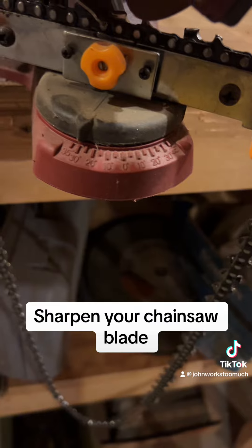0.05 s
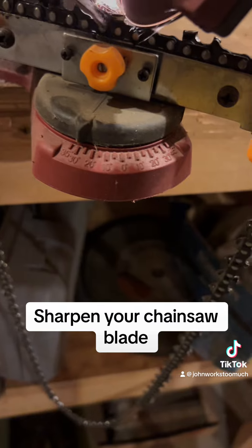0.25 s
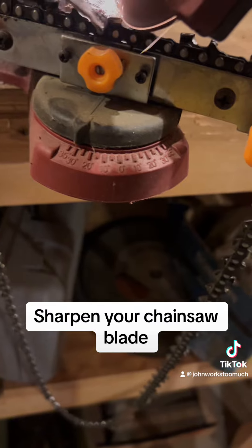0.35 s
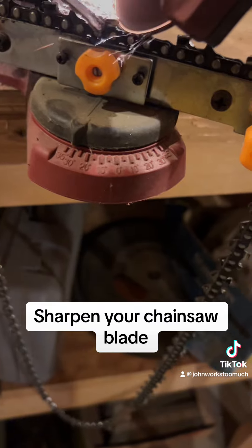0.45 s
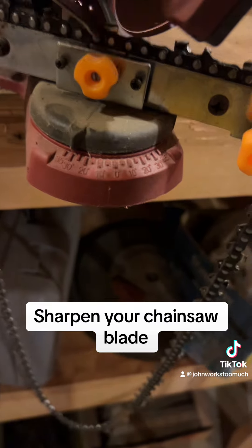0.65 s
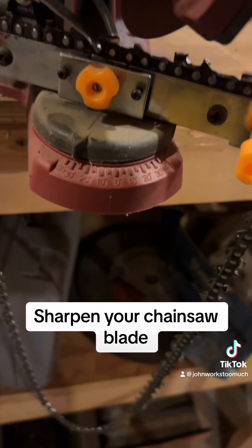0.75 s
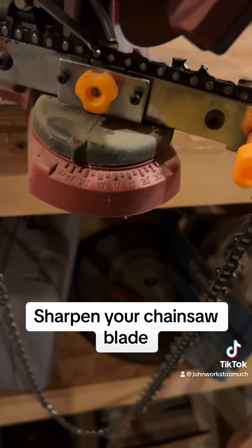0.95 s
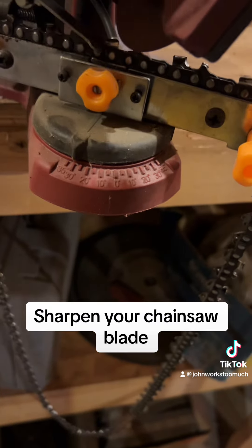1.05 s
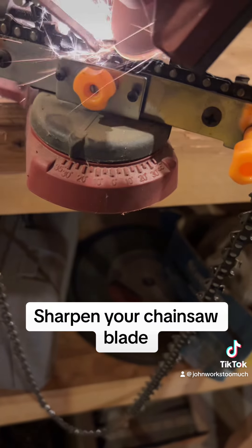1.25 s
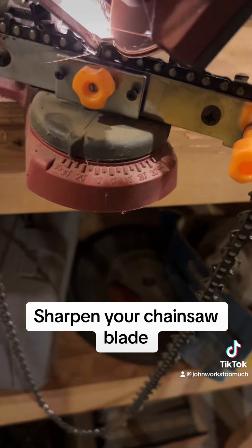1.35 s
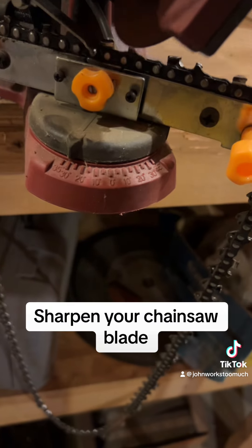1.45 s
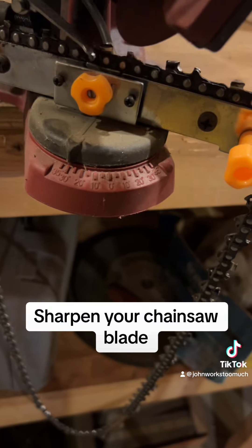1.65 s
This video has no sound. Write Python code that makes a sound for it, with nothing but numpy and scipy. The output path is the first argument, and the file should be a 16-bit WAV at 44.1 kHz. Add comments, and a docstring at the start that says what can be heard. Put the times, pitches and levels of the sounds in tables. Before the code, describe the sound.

Close to the microphone in a workshop, a chain sharpener's wheel bites a metal tooth twice with a high, gritty scrape. Underneath, the motor hums and whines, sagging in pitch with each grind, then recovering.

```python
"""At a workbench, a phone's two microphones stand close to a small chain sharpener that is running.
Its brushed motor whines over mains hum and the rush of brushes and fan. Twice the wheel is lowered
onto a chain tooth: the grit rings tooth, chain and vise, hardest once a turn. The load slows the
motor, whose whine climbs back after each pass. The phone's gain control ducks the loud passes."""
import sys
import numpy as np
from scipy import signal
from scipy.fft import rfft, irfft
from scipy.io import wavfile
from scipy.ndimage import uniform_filter1d

SR = 44100
rng = np.random.default_rng(int(sys.argv[2]) if len(sys.argv) > 2 else 0)


def generate_wav(sig):
    """Save sig (samples, or channels by samples) to the path in sys.argv[1] as 16-bit PCM at SR."""
    pcm = np.round(np.clip(np.atleast_2d(sig).T, -1, 1) * 32767).astype(np.int16)
    wavfile.write(sys.argv[1], SR, pcm)


N = 74970

# Mains hum. Each row: frequency in Hz, level in dB.
MAINS_HUM = [(120, -59.5), (240, -57.5), (480, -59), (600, -60.5), (720, -57)]
# Spectrum of brushes and fan. Each row: frequency in Hz, relative level in dB.
RUSH_SPECTRUM = [(18, -49), (30, -13.5), (63, 6), (237, -13), (409, -20), (802, -7), (1110, -16),
                 (1690, -17.5), (1920, -16.5), (3310, -20.5), (4930, -18.5), (5730, -16.5), (8120, -17.5),
                 (9900, -20), (11500, -35), (15000, -82), (22000, -120)]
# The shaft, sagging twice under load. Each row: time in seconds, speed in Hz.
SHAFT_SPEED = [(0, 75.78), (.215, 75.78), (.304, 74.3), (.394, 71.7), (.452, 69.8), (.48, 67.2),
               (.548, 59.4), (.6, 57.2), (.65, 56.6), (.688, 61.28), (.718, 63.6), (.74, 65.17),
               (.782, 67.33), (.82, 68.7), (.862, 70.1), (.918, 71.42), (.978, 72.6), (1.016, 73.17),
               (1.095, 73.9), (1.15, 72.1), (1.2, 69.8), (1.23, 67.), (1.278, 60.6), (1.332, 56.4),
               (1.37, 54.8), (1.422, 54.6), (1.458, 60.03), (1.502, 63.4), (1.54, 65.75), (1.584, 67.8),
               (1.658, 70.35), (1.7, 71.05)]
# Tones of the shaft. Each row: multiple of the shaft speed, level at full speed in dB.
SHAFT_TONES = [(1, -46.5), (2, -61.5), (3, -64.5), (6, -65.5), (8, -72), (10, -64), (11, -74), (13, -56),
               (23, -69.5), (78, -60), (79, -72), (80, -70), (107, -59), (108, -83)]
# Commutator whine. Each row: multiple of the bar rate, level at full speed in dB,
# share of once-a-turn wobble, loss in dB per Hz of slowing.
WHINE_TONES = [(1, -50.5, 0.067, 0.6), (2, -60, 0.22, -0.5), (3, -56.5, 0.066, 1.), (4, -48, 0.15, 1.7),
               (5, -63, .3, 0.5), (6, -51.5, 0.13, 2), (7, -63.5, 0.34, -0.2), (8, -52.5, 0.46, 0.56),
               (9, -67, 0.48, -1.2), (10, -60, 0.23, .1), (11, -77, 0.53, 9)]
# Casing and bench resonances. Each row: frequency in Hz, width in Hz, lift of a passing tone in dB.
CASING_MODES = [(77.7, 10, 7), (779, 26, 3), (1590, 130, 14.5), (3413, 97, 6), (6500, 220, -2),
                (8440, 1200, 11.5)]
# One list per pass of the wheel. Each row: time in seconds, treble ring level in dB, body level in dB.
WHEEL_PASSES = [
    [(.2148, -21.5, -41), (.25, -17, -35.5), (.33, -18.5, -32), (.4, -17.5, -28), (.45, -16, -27),
     (.475, -12.5, -33.5), (.5, -14.5, -25.5), (.58, -14.5, -32), (.625, -21, -28.5), (.645, -21.5, -27),
     (.654, -32, -19)],
    [(1.0955, -18.5, -42.5), (1.135, -18, -31.5), (1.2, -16.5, -30.5), (1.222, -14, -38), (1.25, -12, -30),
     (1.3, -16, -32.5), (1.36, -15, -33.5), (1.39, -20, -30), (1.42, -19.5, -31), (1.431, -35, -35)],
]
# Resonances of tooth, chain and vise, the treble ring and the lower body.
# Each row: frequency in Hz, width in Hz, relative level in dB.
RING_MODES = [(3350, 150, -16), (4186, 34, -6), (5800, 104, -10), (6692, 205, -2), (7566, 174, -4),
              (8190, 34, -27), (8703, 415, -5), (9660, 160, -10), (10130, 127, -6.5), (11500, 320, -9.5)]
BODY_MODES = [(664.9, 17.2, 4.5), (1346, 54, -3), (1632, 67, -0.5), (2200, 158, -2.5), (2609, 45, 0.5)]
# The smooth spectra under those resonances. Each row: frequency in Hz, relative level in dB.
RING_FLOOR = [(2500, -27.5), (3000, -28), (4000, -19.5), (5000, -11.5), (6000, -29.5), (8000, -35),
              (10000, -18), (11000, -12), (11600, -16.5)]
BODY_FLOOR = [(60, -4), (150, -63), (300, -16.5), (500, -18), (900, -9), (1100, -14), (2000, -15),
              (2900, -18.5), (3400, -59)]
# Phase between the microphones. Each row: frequency in Hz, lead of the left in radians.
MIC_PHASE = [(0, 0), (2500, -.05), (3300, -.4), (4000, -.15), (4400, -.8), (4700, -1.6), (5020, -3.1),
             (5350, -5.6), (5700, -6.25), (7300, -6.3), (8000, -6.7), (9000, -7.1), (10000, -7.8),
             (11900, -9.2)]
# Balance between the microphones. Each row: frequency in Hz, left minus right in dB.
MIC_BALANCE = [(60, 0), (350, 0), (620, -2.6), (1100, -.5), (2000, 0), (3500, 1), (4300, 4), (5000, 1),
               (5800, 0), (11500, 0)]
# Scattered sound at the microphones. Each row: frequency in Hz, level against the direct sound in dB.
MIC_SCATTER = [(60, -61), (180, -22), (350, -17.5), (620, -9.5), (1100, -9.5), (1600, -33.5), (2400, -103),
               (2900, 6), (3300, -5.5), (3900, -15), (4400, -4), (5300, -72), (5700, -16), (6000, -31),
               (7000, -48), (7500, -18), (8200, 1), (9400, -20), (11500, -25)]

TIME = np.arange(N) / SR


def amp(db):
    """Decibels to amplitude."""
    return 10 ** (np.asarray(db) / 20)


def unit_rms(x):
    """The signal scaled to an rms of 1."""
    return x / np.sqrt(np.mean(x ** 2) + 1e-20)


def curve_at(points, hz):
    """A curve read along a logarithmic frequency axis."""
    freqs, values = np.transpose(points)
    return np.interp(np.log(hz + 1), np.log(freqs + 1), values)


def drift(seconds):
    """Random wander of rms 1, smoothed over the given time."""
    size = int(seconds * SR)
    return unit_rms(uniform_filter1d(uniform_filter1d(rng.standard_normal(N), size), size))


def resonance(hz, centre, width):
    """Bell-shaped response, 1 at its centre."""
    return 1 / (1 + (2 * (hz - centre) / width) ** 2)


def resonate(x, floor, modes):
    """Minimum-phase filter of resonances over a smooth floor; white noise keeps its rms."""
    hz = np.fft.rfftfreq(8192, 1 / SR)
    power = amp(2 * curve_at(floor, hz)) + sum(amp(2 * db) * resonance(hz, f, w) for f, w, db in modes)
    cepstrum = irfft(np.log(power + 1e-10) / 2)
    causal = np.r_[1, 2 * np.ones(4095), 1, np.zeros(4095)]
    taps = irfft(np.exp(rfft(cepstrum * causal)))[:4096]
    return signal.oaconvolve(x, taps / np.linalg.norm(taps))[:N]


def roughness(turns, repeat_share, grain_db, wear_turns=6):
    """Noise of a turning surface: part returns every turn and wears slowly, the rest is new."""
    def grains(shape):
        sizes = amp(grain_db * np.minimum(rng.exponential(1, shape), 3.5))
        return unit_rms(rng.standard_normal(shape) * sizes)
    layers = grains((64, 600))
    place = (turns % 1 * 600).astype(int)
    age = np.minimum(turns / wear_turns, 62)
    layer, blend = age.astype(int), age % 1 * np.pi / 2
    returning = layers[layer, place] * np.cos(blend) + layers[layer + 1, place] * np.sin(blend)
    return np.sqrt(repeat_share) * returning + np.sqrt(1 - repeat_share) * grains(N)


def workshop_tail(level, t60_s=.085, tail_db=-7):
    """The room's short reverberation: noise that dies away behind the given envelope."""
    decay = amp(-120 / t60_s / SR)
    power = signal.lfilter([1 - decay], [1, -decay], level ** 2)
    return amp(tail_db) * np.sqrt(power) * rng.standard_normal(N)


def wave(cycles):
    """A cosine with a random starting phase."""
    return np.cos(2 * np.pi * (cycles + rng.random()))


def mains_hum():
    """Steady hum at multiples of the mains frequency."""
    return sum(np.sqrt(2) * amp(db) * wave(hz * TIME) for hz, db in MAINS_HUM)


def brushes_and_fan(turns, level_db=-45):
    """A broad rush, half of whose power repeats with each turn."""
    noise = roughness(turns, repeat_share=.5, grain_db=0)
    return amp(level_db) * resonate(noise, RUSH_SPECTRUM, [(807, 28, -.98)])


def shaft_tone(speed, turns, order, db):
    """A tone locked to the shaft: it swells through casing resonances and wavers more when slowed."""
    lift_db = sum(peak_db * resonance(order * speed, f, w) for f, w, peak_db in CASING_MODES)
    waver_db = (.8 + .3 * np.minimum(speed[0] - speed, 8)) * drift(.02)
    return np.sqrt(2) * amp(db + lift_db - lift_db[0] + waver_db) * wave(order * turns)


def motor(speed, turns, bars=12, sag_db_per_hz=-.0445):
    """Commutator bars whine past the brushes, wobbling once a turn, over shaft tones and rush."""
    slowing_hz = speed[0] - speed
    whine = np.zeros(N)
    for multiple, db, wobble, loss in WHINE_TONES:
        tone = shaft_tone(speed, turns, bars * multiple, db - loss * slowing_hz)
        whine += tone * (1 + sum(2 * wobble ** k * wave(k * turns) for k in (1, 2, 3)))
    shaft = sum(shaft_tone(speed, turns, order, db) for order, db in SHAFT_TONES)
    return (whine + shaft + brushes_and_fan(turns)) * amp(sag_db_per_hz * slowing_hz)


def uneven_rim(turns, corner_order=12):
    """Lumps on the wheel's rim knock: wavering shaft orders, weaker above the corner."""
    return unit_rms(sum(amp(2 * drift(.06)) * wave(k * turns) / np.hypot(1, (k / corner_order) ** 2)
                        for k in range(4, 32)))


def grinding(turns, grit_db=3.5, skim_s=.025, bite_depth=.12, knock_fade_s=.3):
    """Grit scratches the tooth, hardest at the wheel's high spot; the scratching rings the metal."""
    ring_level, body_level, knock, thud = np.zeros((4, N))
    for rows in WHEEL_PASSES:
        times, ring_db, body_db = np.transpose(rows)
        since = np.maximum(TIME - times[0], 0)
        contact = (TIME < times[-1]) * np.minimum(since / .0021, 1)
        wheel_turns = turns - np.interp(times[0] + .002, TIME, turns)  # counted from the high spot
        angle = 2 * np.pi * wheel_turns
        # At first only the high spot skims the tooth; the pulsing flattens as the wheel bites.
        depth = bite_depth + (1 - bite_depth) * np.exp(-since / skim_s)
        pressure = contact * (1 + depth * np.cos(angle)) / np.sqrt(1 + depth ** 2 / 2)
        body_gain = amp(np.interp(TIME, times, body_db))
        ring_level += pressure * amp(np.interp(TIME, times, ring_db))
        body_level += pressure * body_gain
        knock += contact * body_gain * np.exp(-(since / knock_fade_s) ** 2) * uneven_rim(wheel_turns)
        thud_level = uniform_filter1d(contact, 600) * amp(-11 * since)
        thud += thud_level * (np.cos(angle) + .33 * np.cos(2 * angle))
    flicker = amp(1.5 * drift(.0018))
    scratch = ring_level * flicker * roughness(turns, repeat_share=.43, grain_db=grit_db)
    rasp = body_level * roughness(turns, repeat_share=.92, grain_db=grit_db)
    ring = resonate(scratch + workshop_tail(ring_level), RING_FLOOR, RING_MODES)
    body = resonate(np.sqrt(.5) * (rasp + knock) + workshop_tail(body_level), BODY_FLOOR, BODY_MODES)
    return ring + body + amp(-39 + 1.4 * drift(.013)) * thud


def scene():
    """The sharpener on its bench, motor and wheel on one shaft, alike in both channels."""
    speed = np.interp(TIME, *np.transpose(SHAFT_SPEED))
    turns = np.cumsum(speed) / SR
    sharpener = mains_hum() + motor(speed, turns) + grinding(turns)
    return np.array([sharpener, sharpener])


def gain_control(x, threshold_db=-40, duck_share=.19, release_db_per_s=37):
    """The phone holds a falling peak level and ducks by a share of its excess over the threshold."""
    power_db = 10 * np.log10(abs(uniform_filter1d((x ** 2).mean(0), 900)) + 1e-12)
    fall_db = TIME * release_db_per_s
    held_db = np.maximum.accumulate(power_db + fall_db) - fall_db
    excess_db = np.maximum(held_db - threshold_db, 0)
    return x / amp(duck_share * signal.lfilter([.002], [1, -.998], excess_db))


def microphones(x):
    """The two microphone ports differ in phase, balance and the scattered sound they catch."""
    hz, _, spectra = signal.stft(x, SR, nperseg=512, noverlap=384)
    frames = spectra.shape[2]
    random_phase = np.exp(2j * np.pi * rng.random((frames // 4 + 1, len(hz)))).repeat(4, 0).T
    scatter = spectra.mean(0) * random_phase[:, :frames] * amp(curve_at(MIC_SCATTER, hz))[:, None]
    lead = np.interp(hz, *np.transpose(MIC_PHASE))
    port = (amp(curve_at(MIC_BALANCE, hz) / 2) * np.exp(.5j * lead))[:, None]
    left, right = spectra[0] * port + scatter, spectra[1] / port - scatter
    return signal.istft([left, right], SR, nperseg=512, noverlap=384)[1][:, :N]


def record(dry):
    """The phone close by: gain control, a low cut at 33 Hz, two microphones, a top edge at 11750 Hz."""
    low_cut = signal.butter(2, 33, "high", fs=SR, output="sos")
    high_cut = signal.firwin(511, 11750, window=("kaiser", 9), fs=SR)
    heard = microphones(signal.sosfilt(low_cut, gain_control(dry)))
    return signal.oaconvolve(heard, high_cut[None], "same")


dry = scene()
out = record(dry)
generate_wav(out)
```